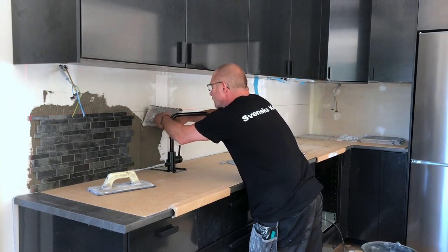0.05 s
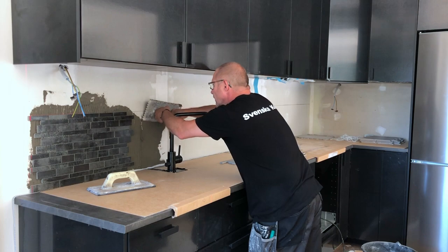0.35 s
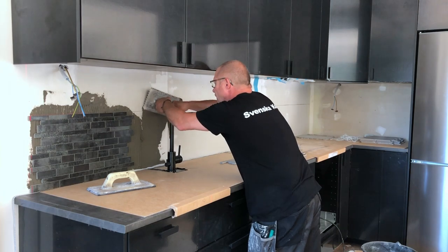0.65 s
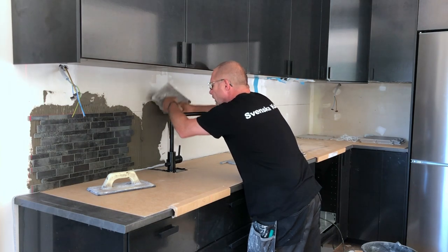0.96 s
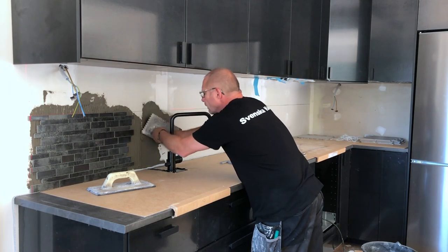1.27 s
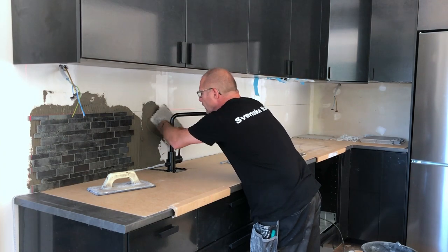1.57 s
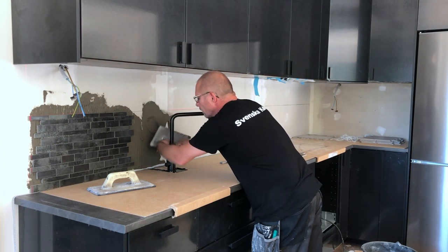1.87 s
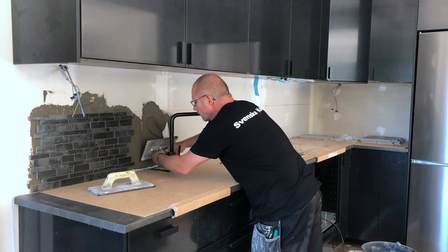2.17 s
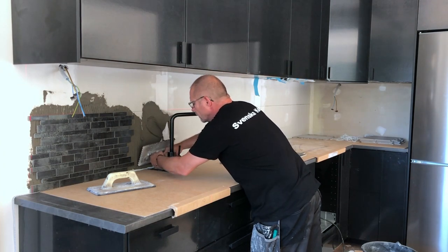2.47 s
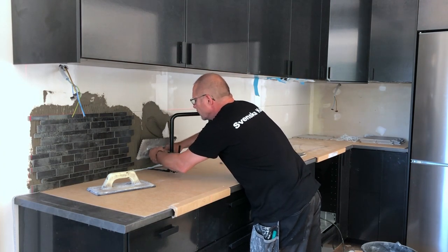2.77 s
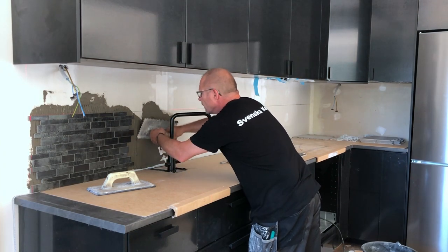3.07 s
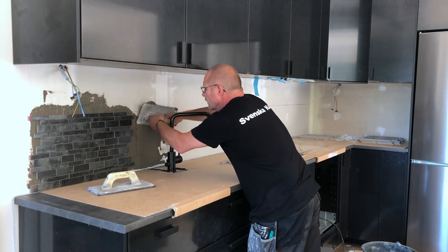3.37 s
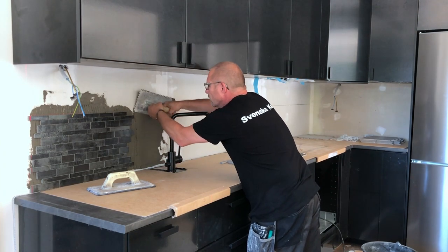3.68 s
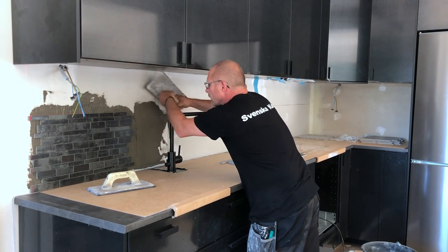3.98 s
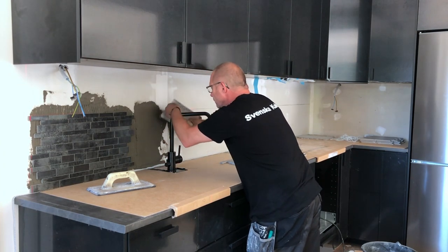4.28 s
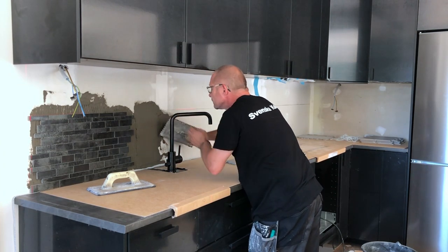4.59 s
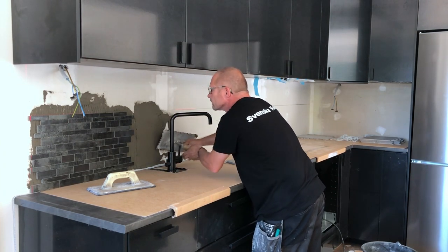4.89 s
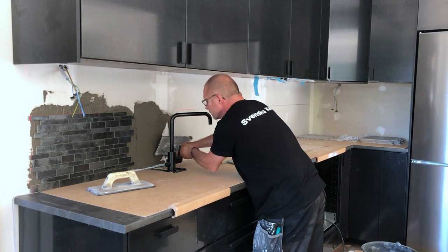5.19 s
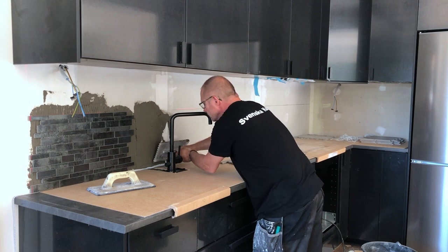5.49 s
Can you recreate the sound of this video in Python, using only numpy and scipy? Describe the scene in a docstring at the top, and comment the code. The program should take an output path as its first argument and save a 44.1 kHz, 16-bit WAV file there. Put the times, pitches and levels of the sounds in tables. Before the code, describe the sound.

A steel trowel works wet tile adhesive over a kitchen wall, with short, hard room reflections and quiet, steady background noise. Soft smearing leads to a sudden gritty scrape at about 0.8 seconds, with a tick and a light knock. A weaker, short scrape follows at 1.6 seconds. Around 2 seconds there is a dull knock on the wall and a faint, low thud from the worktop. A longer sandy rasp comes at 3 seconds, followed by a faint deep rumble. From about 3.6 seconds another stroke builds, the blade squeaking hoarsely in quick little bursts, until a sharp tick and a knock on the wall at 4 seconds. Two smaller, lower squeaks follow as the scrape dies away. From there to the end, around 5.6 seconds, only soft, wet smearing and a light hiss of paste remain.

```python
"""A notched steel trowel spreads tile adhesive on a kitchen wall in a few strokes.
Sand in the paste slips under the blade: it rasps, rings the steel and drums the wall's modes.
Stick-slip makes the blade squeak, its edge ticks on grit, and knocks sound the wall.
Between strokes the wet paste smears softly. The nudged worktop booms, a deep rumble swells,
and the hard room rings over a steady background."""
import sys
import numpy as np
from scipy import signal
from scipy.fft import rfft, irfft, next_fast_len
from scipy.io import wavfile

SR = 44100
rng = np.random.default_rng(int(sys.argv[2]) if len(sys.argv) > 2 else 0)


def inscribe(sig):
    """Save sig as 16-bit PCM at rate SR to the path in sys.argv[1].

    A 1-D sig is mono; a 2-D sig holds one channel per row.
    Samples are clipped to [-1, 1] before scaling.
    """
    pcm = np.round(np.clip(np.atleast_2d(sig).T, -1, 1) * 32767)
    wavfile.write(sys.argv[1], SR, pcm.astype(np.int16))


N = 248720
TIME = np.arange(N) / SR
LOW_CUT_HZ, HIGH_CUT_HZ = 27, 15900
FADE_DB = 30  # level change over one rise or release
# envelope relative to the drag: (rise steepness, hold share, release steepness)
BITE_LAW = (0.99, 0.59, 2.4)
PRESS_LAW = (1.16, 0.88, 1.61)

# spectral shapes: (frequency [Hz], relative density [dB])
AIR_SPECTRUM = [(15, -27), (25, -1), (42, -2.5), (91, 0.5), (183, 2.5), (389, -0.5), (600, -3.5), (800, -8),
                (1300, -4.5), (2060, -12), (4870, -11), (9550, -19.5), (15500, -27.5)]
RUMBLE_SPECTRUM = [(20, -29), (31, -2), (42, 1), (70, -22), (130, -12.5), (400, -62), (2000, -98)]
PASTE_SPECTRUM = [(100, -14), (400, -3), (800, 10), (1300, 5), (2400, 3.5), (4500, 3), (7000, -9),
                  (10000, -13), (16000, -25)]
FIZZ_SPECTRUM = [(100, -29), (3000, -10.5), (8000, -6.5), (12000, -11), (16000, -15.5)]
TICK_SPECTRUM = [(100, -20), (1500, -8), (3000, -9), (3700, 3.5), (5400, 1.5), (8000, -6.5), (10000, -8.5),
                 (16000, -15)]
GRIT_SPECTRUM = [(100, -48), (1000, -17.5), (2800, -6), (5500, -7.5), (9000, -8), (11000, -15.5),
                 (16000, -18)]
RASP_SPECTRUM = [(40, -30), (125, -5.5), (400, -12), (680, -7), (950, -7.5), (1170, 2.5), (1350, 1),
                 (1600, -1), (2300, -10), (3200, -9.5), (5000, -14), (8000, -20), (16000, -28.5)]
# kitchen decay: (frequency [Hz], t60 [s])
ROOM_DECAY = [(100, 0.82), (300, 0.48), (1000, 0.63), (2200, 0.7), (5000, 0.58), (9000, 0.27), (16000, 0.4)]
# worktop with cabinet; paste-damped steel blade: (frequency [Hz], relative level [dB], t60 [s])
WORKTOP_MODES = [(43.3, -5.5, 0.67), (55.7, 4, 0.1), (79, 4, 0.12), (130, 4.5, 0.075)]
BLADE_MODES = [(487, -1.5, 0.088), (882, 6, 0.023), (1360, -5, 0.052), (1588, 2.5, 0.033),
               (1830, -4.5, .06), (2325, -2.5, .035), (3166, -3, 0.056), (3632, -6.5, 0.055),
               (5380, -10, 0.045), (6600, -9, 0.045), (8740, -6.5, 0.026)]
# wall with the blade on it: (frequency [Hz], t60 [s], relative level at places 0, 1, 2 [dB])
WALL_MODES = [(85.8, 0.59, -31, -32, -18), (122, 0.081, -19, -6.5, -14), (190, 0.088, -5, -4.5, -8),
              (252.3, 0.11, -6.5, -2.5, 1.5), (297.5, 0.076, 0, 0, 3.5), (358, 0.072, 6, -1, -0.5),
              (438.5, 0.074, 3, 2, -27), (478, 0.053, 1.5, 3.5, 7), (574, 0.04, -2, 0.5, -7),
              (718, 0.071, 0.5, 0, 4), (800, 0.032, 5.5, -0.5, 12), (1021, 0.038, 3.5, 1.5, -26),
              (1332, 0.11, 1, -32, -26), (1540, 0.019, -18, -9, -23), (2046, 0.041, -2.5, -4.5, 8),
              (2500, 0.019, 2.5, 5, 8.5), (3120, 0.019, -13, 3, 4.5)]
# deep swells: (centre [s], level [dB], half-width [s])
RUMBLE_SWELLS = [(3.255, -54, 0.18), (3.46, -65, 0.12)]
# nudges of the worktop: (time [s], relative level [dB])
WORKTOP_BUMPS = [(2.044, -39), (2.099, -42), (2.171, -51), (4.031, -41)]
# blade rubbing in paste: (centre [s], level [dB], half-width [s], band centre [Hz])
PASTE_RUBS = [(0.18, -61, 0.062, 455), (0.804, -34.5, 0.011, 700), (0.93, -52.5, 0.045, 335),
              (0.991, -54.5, 0.011, 400), (1.524, -56, 0.024, 790), (2.051, -42, 0.015, 336),
              (2.077, -55, 0.046, 790), (2.15, -58.5, 0.071, 1640), (2.402, -59.5, 0.018, 1280),
              (2.852, -47, 0.012, 1290), (2.903, -46.5, 0.016, 256), (3.046, -52, 0.097, 172),
              (3.6, -54, 0.023, 1500), (3.945, -28.5, 0.0099, 427), (5.083, -67.5, 0.22, 3320),
              (5.5, -65.5, 0.3, 3900)]
# faint hiss after a stroke: (centre [s], level [dB])
AFTER_HISSES = [(1.135, -63), (1.87, -71), (4.325, -71)]
# light slides: (peak time [s], rise [s], release [s], paste [dB], fizz [dB])
PASTE_SLIDES = [(.05, 0.68, 0.64, -64.5, -75), (.77, 1.76, 0.93, -57.5, -62), (1.62, 0.38, .9, -60, -61),
                (2.2, 1.1, 3.6, -64, -94), (2.95, 1.4, 2.3, -62, -68), (3.5, 1.8, 2.5, -61, -65.5),
                (4.3, 0.93, 1.4, -59.5, -84), (4.95, .8, 3.2, -61.5, -66.5), (5.63, 0.81, .6, -61, -80)]
# blows on the wall: (time [s], relative level [dB], contact [ms], place [index])
WALL_KNOCKS = [(0.8129, -14, 0.64, 0), (0.8292, -18.5, 0.54, 0), (2.04, -10, 5, 0), (4.0204, -4, 0.45, 2),
               (4.043, -5.5, 3.2, 2)]
# edge catching on grit: (time [s], level [dB], t60 [s])
EDGE_SNAGS = [(.799, -35, 0.022), (1.604, -40, 0.031), (1.615, -43.5, 0.11), (2.958, -35, 0.011),
              (3.335, -49.5, 0.022), (4.016, -28, 0.04)]
# blade chatter: (centre [s], level [dB], half-width [s], pitch [Hz], octave re fundamental [dB])
BLADE_SQUEAKS = [(3.80, -46, .055, 1590, 2), (3.862, -37.5, .018, 1595, -7), (3.897, -40, .015, 1590, -4),
                 (3.955, -37, .01, 1570, -8), (3.997, -42, .025, 1550, -8), (4.134, -41.5, .018, 820, -20),
                 (4.237, -48.5, .011, 825, -20)]
# trowel strokes: (full speed at [s], rise [s], hold [s], release [s], drag [dB], edge bite [dB],
# wall pressure [dB], steel ring [dB], place [index])
TROWEL_STROKES = [ (.809, 0.042, 0.0091, 0.21, -36.5, -37, -29.5, -41, 0),
                  (1.653, 0.03, 0.0074, 0.18, -45.5, -45.5, -45, -45, 0),
                  (2.956, 0.17, 0.1, .21, -34.5, -42, -48, -50, 1),
                  (3.905, 0.39, 0.051, 0.22, -37.5, -36, -34.5, -42, 1),
                  (4.027, 0.005, 0.019, 0.3, -45.5, -46, -38, -55, 2)]


def amp(db):
    """Decibels to gain."""
    return 10 ** (np.asarray(db) / 20)


def unit(x):
    """Scale to rms 1."""
    return x / np.sqrt(np.mean(x ** 2) + 1e-20)


def lookup(points, hz):
    """Interpolate (frequency [Hz], value) on a log-frequency axis."""
    points_hz, values = np.transpose(points)
    return np.interp(np.log(hz + 1), np.log(points_hz + 1), values)


def add(mix, at_s, sound):
    """Mix a sound in, in place."""
    part = mix[round(at_s * SR):][:len(sound)]
    part += sound[:len(part)]


def colour(x, spectrum, size=4096):
    """Minimum-phase filter; keeps the power of white noise."""
    log_gain = np.log(amp(lookup(spectrum, abs(np.fft.fftfreq(size, 1 / SR)))))
    taps = np.fft.ifft(np.exp(np.conj(signal.hilbert(log_gain)))).real[:size // 2]
    return signal.oaconvolve(x, taps / np.linalg.norm(taps))[:len(x)]


def wander(cutoff_hz):
    """Low-passed noise, rms 1."""
    size = next_fast_len(N)
    lowpass = np.exp(-(np.fft.rfftfreq(size, 1 / SR) / cutoff_hz) ** 2)
    return unit(irfft(rfft(rng.standard_normal(size)) * lowpass, size)[:N])


def grains(per_s, spread_db):
    """Random clicks, most small, a few large; rms 1."""
    size = amp(spread_db * np.minimum(rng.exponential(1, N), 4))
    return unit(size * rng.choice([-1, 1], N) * (rng.random(N) < per_s / SR))


def swell(centre_s, half_width_s):
    """Gaussian envelope, 17 dB down at the half-width."""
    return np.exp(-2 * np.minimum(((TIME - centre_s) / half_width_s) ** 2, 20))


def effort(at_s, rise_s, hold_s, release_s):
    """Envelope of one arm movement; ramps linear in dB."""
    away = np.maximum(at_s - TIME, 0) / rise_s + np.maximum(TIME - at_s - hold_s, 0) / release_s
    return amp(-FADE_DB * np.minimum(away, 10))


def ring(modes):
    """Impulse response of a body; adjacent modes alternate in sign."""
    t = TIME[:SR // 2]
    return sum((-1) ** k * amp(db - 60 * t / t60_s) * np.sin(2 * np.pi * hz * t)
               for k, (hz, db, t60_s) in enumerate(modes))


def resonate(force, modes):
    """Drive a body's modes; unit-energy response."""
    response = ring(modes)
    return signal.oaconvolve(force, response / np.linalg.norm(response))[:N]


def wall(force, place):
    """Wall response; the contact place weights the modes."""
    return resonate(force, [(hz, places_db[place], t60_s) for hz, t60_s, *places_db in WALL_MODES])


def air():
    """Steady room noise."""
    return amp(-59) * colour(rng.standard_normal(N), AIR_SPECTRUM, size=16384)


def kitchen(x, wet_db, build_s):
    """Direct sound plus dense reflections off hard fronts and walls; decay varies by band."""
    echoes_per_s = 4000
    echoes = rng.choice([-1., 1.], SR) * (rng.random(SR) < echoes_per_s / SR)
    hz, t, bands = signal.stft(echoes, SR, nperseg=256)
    decay = amp(-60 * t / lookup(ROOM_DECAY, hz)[:, None])
    tail = signal.istft(bands * decay, SR, nperseg=256)[1][:SR]
    tail *= 1 - np.exp(-TIME[:SR] / build_s)
    return x + amp(wet_db) * signal.fftconvolve(x, tail / np.linalg.norm(tail))[:N]


def rumble():
    """Deep noise swells and fades."""
    envelope = sum(amp(db) * swell(at_s, half_width_s) for at_s, db, half_width_s in RUMBLE_SWELLS)
    return envelope * colour(rng.standard_normal(N), RUMBLE_SPECTRUM, size=16384)


def bumps():
    """The nudged worktop booms briefly."""
    out, boom = np.zeros(N), ring(WORKTOP_MODES)
    for at_s, db in WORKTOP_BUMPS:
        add(out, at_s, amp(db) * boom)
    return amp(-2.5) * out


def rubs(hiss_half_width_s=0.063, hiss_hz=11000):
    """Soft grainy rubs in the paste and faint high hisses, each an octave wide."""
    out, paste = np.zeros(N), grains(per_s=3600, spread_db=2.5)
    hisses = [(at_s, db, hiss_half_width_s, hiss_hz) for at_s, db in AFTER_HISSES]
    for at_s, db, half_width_s, hz in PASTE_RUBS + hisses:
        edges_hz = [hz / np.sqrt(2), min(hz * np.sqrt(2), HIGH_CUT_HZ)]
        band = signal.butter(2, edges_hz, "band", fs=SR, output="sos")
        out += amp(db) * swell(at_s, half_width_s) * unit(signal.sosfilt(band, paste))
    return out


def smear(fizz_decay_ratio=1.1):
    """Wet paste hisses and fizzes under a lightly held blade; slides add in power."""
    paste, fizz = np.zeros((2, N))
    for at_s, rise_s, release_s, paste_db, fizz_db in PASTE_SLIDES:
        paste = np.hypot(paste, amp(paste_db) * effort(at_s, rise_s, 0, release_s))
        fizz = np.hypot(fizz, amp(fizz_db) * effort(at_s, rise_s, 0, release_s / fizz_decay_ratio))
    paste *= grains(per_s=11000, spread_db=3.5)
    fizz *= grains(per_s=11000, spread_db=3.0)
    return colour(paste, PASTE_SPECTRUM) + colour(fizz, FIZZ_SPECTRUM)


def knocks():
    """Force pulses on the wall; longer contact sounds duller."""
    out, t = np.zeros(N), TIME[:SR // 2]
    for at_s, db, contact_ms, place in WALL_KNOCKS:
        progress = t / (contact_ms / 1000) * np.pi
        push = progress * np.exp(-progress)
        add(out, at_s, wall(amp(db) * push / push.sum(), place))
    return amp(10.5) * out


def ticks(ring_db=-7.5):
    """The edge snags and lets go; each burst pings the steel."""
    bursts, t = np.zeros(N), TIME[:SR // 10]
    for at_s, db, t60_s in EDGE_SNAGS:
        add(bursts, at_s, amp(db - 60 * t / t60_s) * rng.standard_normal(len(t)))
    return colour(bursts, TICK_SPECTRUM) + amp(ring_db) * resonate(bursts, BLADE_MODES)


def squeaks(pitch_jitter=0.016):
    """Stick-slip locks briefly onto a blade mode: a hoarse tone plus octave."""
    out = np.zeros(N)
    uneven_time_s = np.cumsum(1 + pitch_jitter * wander(cutoff_hz=199)) / SR
    for at_s, db, half_width_s, hz, octave_db in BLADE_SQUEAKS:
        phase = 2 * np.pi * hz * uneven_time_s
        tone = unit(np.sin(phase) + amp(octave_db) * np.sin(2 * phase))
        out += amp(db) * swell(at_s, half_width_s) * tone
    return out


def scrape(clump_db=1.5):
    """Sand slips in uneven clumps: the blade rasps and rings, its edge hisses, the wall drums."""
    clumps = unit(amp(clump_db * wander(cutoff_hz=129)))
    slips = clumps * grains(per_s=3000, spread_db=1.5)
    sand = clumps * grains(per_s=12000, spread_db=2.0)
    shudder = clumps * grains(per_s=2500, spread_db=4.0)
    drag, bite, flex, drum = np.zeros((4, N))
    for at_s, rise_s, hold_s, release_s, drag_db, bite_db, press_db, ring_db, place in TROWEL_STROKES:
        speed = effort(at_s, rise_s, hold_s, release_s)
        edge, press = (effort(at_s, rise_s / up, hold_s * share, release_s / down)
                       for up, share, down in (BITE_LAW, PRESS_LAW))
        drag += amp(drag_db) * speed
        flex += amp(ring_db) * speed
        bite += amp(bite_db) * edge
        drum += wall(amp(press_db) * press * shudder, place)
    rasp = colour(drag * slips, RASP_SPECTRUM)
    hiss = colour(bite * sand, GRIT_SPECTRUM)
    return rasp + hiss + resonate(flex * shudder, BLADE_MODES) + drum


def scene():
    """Trowel and worktop in the kitchen, over rumble and room noise; mono."""
    trowel = scrape() + squeaks() + smear() + rubs() + knocks() + ticks()
    low = kitchen(bumps(), wet_db=-12.0, build_s=0.0069) + rumble()
    return (kitchen(trowel, wet_db=-7.5, build_s=0.0012) + low + air())[None]


def record(dry):
    """Low cut, then steep high cut."""
    low_cut = signal.butter(4, LOW_CUT_HZ, "high", fs=SR, output="sos")
    high_cut = signal.firwin(511, HIGH_CUT_HZ, window=("kaiser", 9), fs=SR)
    return signal.oaconvolve(signal.sosfilt(low_cut, dry), high_cut[None], "same")


dry = scene()
out = record(dry)
inscribe(out)
```